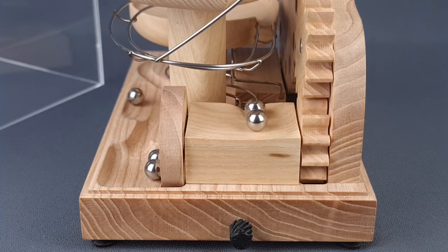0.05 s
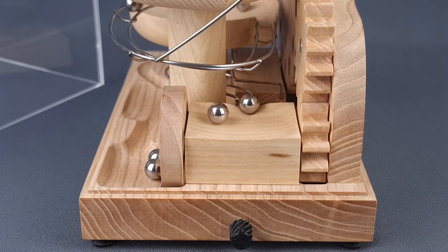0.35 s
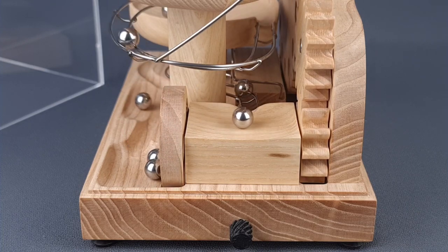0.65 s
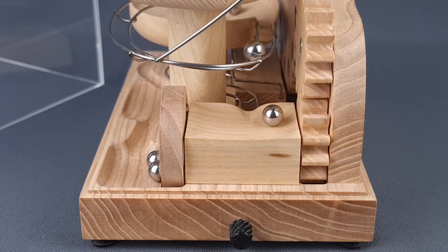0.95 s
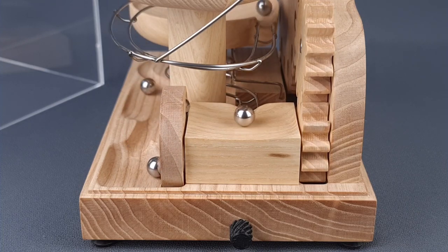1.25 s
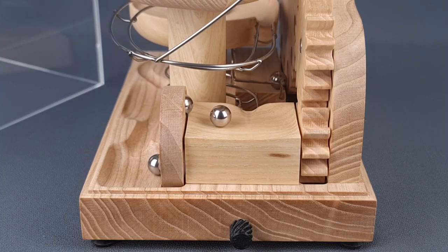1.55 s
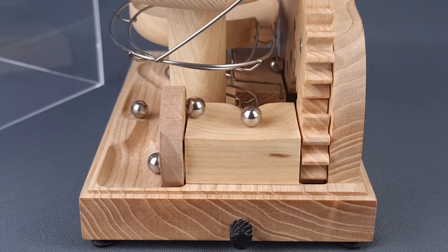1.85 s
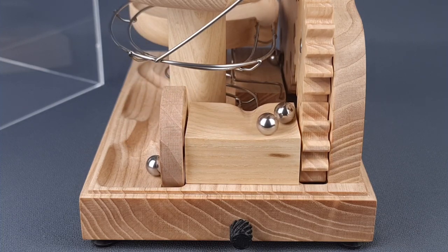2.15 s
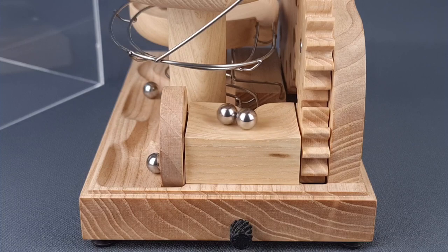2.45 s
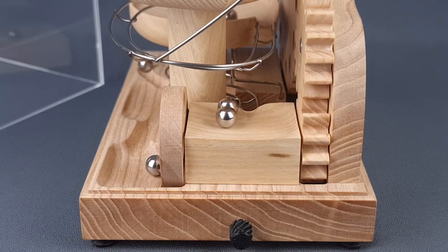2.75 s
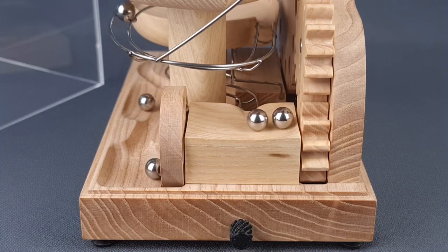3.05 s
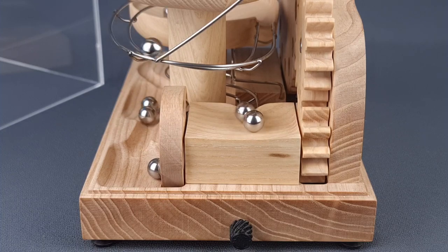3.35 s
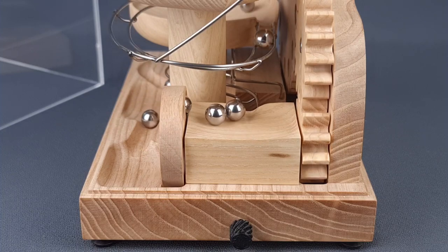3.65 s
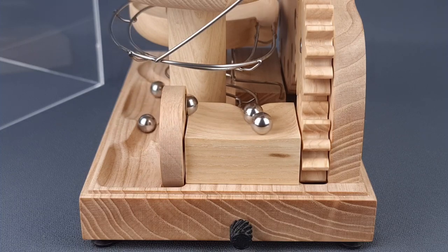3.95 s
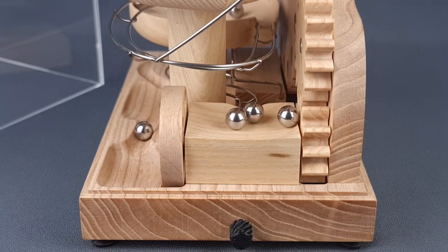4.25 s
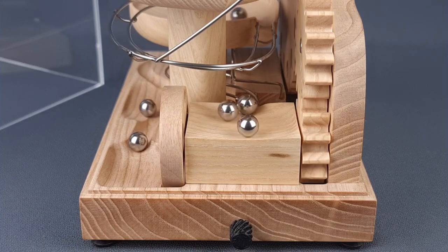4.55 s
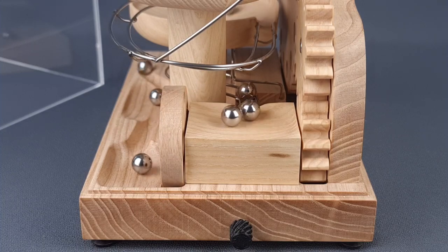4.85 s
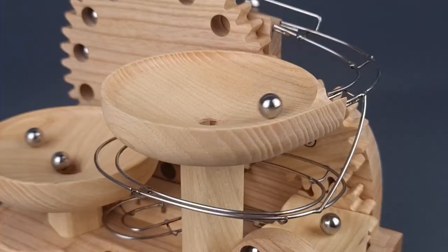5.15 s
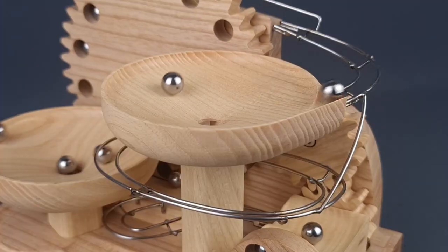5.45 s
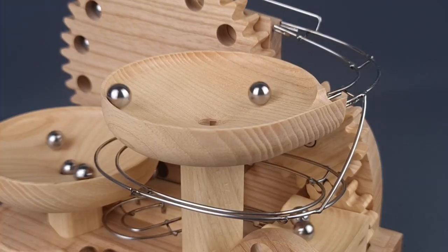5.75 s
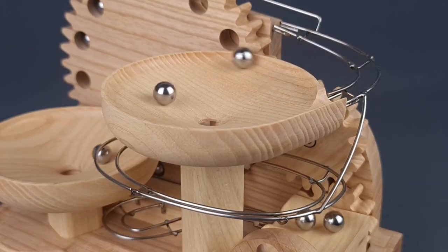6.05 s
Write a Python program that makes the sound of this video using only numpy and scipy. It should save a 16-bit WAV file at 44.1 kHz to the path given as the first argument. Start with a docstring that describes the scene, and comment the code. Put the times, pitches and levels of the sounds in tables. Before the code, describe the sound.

Several small steel balls run continuously through a wooden marble machine. They rumble over carved trays, land on wire rails with ringing pings and rattle along them in short swells. Irregular wooden knocks and bright ball-on-ball clicks come throughout, over a faint hollow hum from the base. Near the end the rolling grows louder as balls circle in a wooden dish. Heard close up in a quiet room.

```python
"""Wooden marble machine

Steel balls run through a small wooden machine on a table in a quiet room. They rumble over trays,
circle in a turned dish and sizzle and rattle along wire rails. They knock on the wood and click
against each other; one mode of the wood sings along, and the hollow base booms underneath."""
import sys
import numpy as np
from scipy import signal
from scipy.fft import rfft, irfft, next_fast_len
from scipy.io import wavfile
from scipy.ndimage import uniform_filter1d, map_coordinates

SR = 44100
rng = np.random.default_rng(int(sys.argv[2]) if len(sys.argv) > 2 else 0)


def master(y):
    """Save y as 16-bit WAV."""
    cut = np.clip(np.atleast_2d(y).T, -1, 1)
    pcm = np.round(cut * 32767)  # scale
    wavfile.write(sys.argv[1], SR, pcm.astype(np.int16))


N = 273420

# Faders for rolling on the trays and in the dish. Each row: time in seconds, relative level in dB.
TRAY_FADER = [(0.0, -52.5), (0.35, -58.5), (1.23, -53.5), (1.39, -47), (2.19, -50.5), (2.43, -55),
              (3.19, -58.5), (3.66, -53.5), (4.02, -44.5), (4.24, -55), (5.08, -48), (5.2, -54)]
DISH_FADER = [(5.18, -48), (5.36, -44.5), (5.51, -43.5), (5.62, -44), (6.04, -45), (6.2, -52)]
# A ball gathers speed on the rails and runs out. Each row: fastest moment in seconds,
# relative level in dB, run-up in seconds, run-out in seconds.
RAIL_RUNS = [(0.09, -47.5, 0.19, 0.11), (0.51, -51, 0.34, 0.1), (0.77, -51.5, 0.31, 0.2),
             (0.989, -42.5, 0.19, 0.11), (1.22, -44.5, 0.27, 0.14), (2.57, -45, 0.025, 0.11),
             (2.698, -47.5, 0.15, 0.095), (3.06, -56, 0.41, 0.93), (3.44, -48.5, 0.15, 0.15),
             (3.61, -41.5, 0.084, 0.12), (3.822, -43, 0.14, 0.082), (4.59, -44, 0.062, 0.057),
             (4.681, -37, 0.075, 0.036), (4.766, -39.5, 0.11, 0.011), (4.95, -46.5, 0.046, 0.031),
             (5.393, -40, 0.33, 0.17), (5.481, -41, 0.11, 0.035)]
# A ball lands on the rails. Each row: start in seconds, hit level in dB, chatter in dB against the hit,
# wire ring level in dB, ring pitch in Hz.
RAIL_LANDINGS = [(0.5224, -35, 2, -36, 5120), (0.827, -32.5, -5.5, -53, 4400),
                 (1.166, -25.5, -17, -35, 4360), (2.4062, -48, -17, -30.5, 3500),
                 (2.5213, -33, 6.5, -35, 4340), (2.5268, -34.5, 8.5, -35.5, 3000),
                 (2.672, -41, 7, -48, 5450), (3.379, -36.5, -1, -47, 3440), (3.7775, -25.5, -20, -36, 4660),
                 (4.189, -21, -14.5, -39, 3500), (4.5343, -24, 0, -21, 3515), (4.7644, -36, 8.5, -33, 5110),
                 (5.0543, -19.5, -20, -41, 5180), (5.258, -18.5, -8.5, -22, 3497)]
# A ball hits wood. Each row: start in seconds, frame level in dB, pitch of the struck spot in Hz,
# its ring level in dB, treble tilt of the frame in dB per octave.
WOOD_KNOCKS = [(0.5225, -31, 3450, -23, 5), (1.3825, -21, 3820, -17.5, -12), (1.393, -24, 1950, -22, -8),
               (1.4108, -19, 3280, -21.5, -2), (1.435, -25, 4300, -21.5, -14),
               (1.488, -13.5, 3780, -12, -1.5), (1.948, -19.5, 4100, -27, -3),
               (2.4061, -19, 3460, -19, -19), (4.0096, -26, 1950, -25.5, -4), (4.0305, -31, 2030, -28, -13),
               (4.0894, -16.5, 1940, -29.5, -19), (4.1562, -20, 3340, -25, -8),
               (4.547, -10, 3450, -22, -17), (5.2285, -15.5, 2400, -33, 0), (5.2706, -9.5, 3640, -16, -9),
               (5.4925, -16, 5100, -22, 1), (5.617, -15.5, 5060, -23, -3), (5.7, -15.5, 6350, -18.5, 3),
               (5.947, -32, 4520, -22.5, -7), (5.9705, -14, 3280, -15.5, -8),
               (6.1825, -22.5, 3180, -27, -16)]
# Light taps on a tray wall. Each row: start in seconds, level in dB.
WALL_TAPS = [(1.6435, -36), (1.694, -35), (1.7161, -39), (2.106, -31), (2.1631, -30), (2.229, -25.5),
             (2.2808, -31), (2.4705, -25), (2.484, -31)]
# Ball against ball. Each row: start in seconds, level in dB, centre in Hz, left minus right in dB.
BALL_CLICKS = [(0.148, -32, 12100, 1), (1.3114, -35, 14000, 0), (1.337, -21, 9700, 0),
               (1.868, -30, 7300, 5), (2.0703, -30.5, 10900, -4), (3.364, -28.5, 8300, 4),
               (4.058, -26, 6000, 4), (4.186, -25.5, 7200, 5), (4.249, -23, 12900, -5),
               (4.463, -33, 9500, 5), (5.09, -23, 13300, 2), (6.052, -27, 13900, 0)]
# A ball crosses the wood's most resonant spot (sings) or the hollow base (booms).
# Each row: start in seconds, level in dB, hold in seconds.
SINGS = [(1.255, -39, 0.015), (1.393, -36, 0.03), (1.484, -33, 0.012), (1.573, -40.5, 0.026),
         (1.94, -48, 0.044), (4.031, -31, 0.021), (4.075, -36, 0.037), (4.326, -41.5, 0.023),
         (4.385, -50, 0.11), (5.36, -38, 0.15)]
BOOMS = [(0.97, -60, 0.23), (1.93, -49.5, 0.028), (2.08, -56, 0.33), (3.4, -60, 0.91), (4.08, -50.5, 0.028),
         (5.02, -53.5, 0.079), (5.945, -45.5, 0.038)]
# The standout resonances of each part. Each row: pitch in Hz, bandwidth in Hz, relative level in dB.
TRAY_MODES = [(423.7, 10.3, -12.5), (1641, 26, -1), (2001.4, 23, 2), (2994, 91, -10.5), (3490, 99, -13.5)]
DISH_MODES = [(1310, 55, 8.4), (1678, 50, 10.7), (2010, 32, 11.8)]
RAIL_MODES = [(3024, 79, -6), (3463, 46, 0), (4483, 81, -0.5), (6170, 170, -0.5), (8850, 320, -6)]
# The bed of dense, weaker modes between them. Each row: frequency in Hz, relative level in dB.
TRAY_BED = [(150, -27), (330, -39.5), (440, -17), (880, -23.5), (1350, -8.5), (1700, -15.5), (2400, -15.5),
            (4600, -30), (8400, -35.5), (10300, -46), (14000, -78)]
DISH_BED = [(300, -31), (450, -14.5), (900, -22), (1250, -3), (2100, -15), (2500, -10), (3000, -12),
            (5500, -27), (8500, -30.5), (16000, -70)]
RAIL_BED = [(300, -29.5), (870, -20), (1100, -2.5), (2400, -4), (6300, -1.5), (7650, -9), (8500, -8),
            (14500, -9.5), (16000, -12)]
# Tone of the hollow base and of the room's air. Each row: frequency in Hz, relative level in dB.
BASE_EQ = [(25, -59), (60, -18), (88, -13.5), (103, 1.5), (121, 8), (145, -13.5), (195, -8.5), (240, -30),
           (900, -43)]
AIR_EQ = [(120, 12), (1000, -31), (8000, 12), (13000, -39)]
# Stereo image. Each row: frequency in Hz, correlation of left and right (1 is mono).
STEREO_CORRELATION = [(200, 0.99), (600, 0.84), (1300, 0.8), (2000, 0.18), (2700, 0.02), (8000, 0.048)]
# Reverb tail. Each row: frequency in Hz, time to fall 60 dB in seconds.
ROOM_DECAY = [(200, 0.2), (2000, 0.2), (6000, 0.11), (15000, 0.0047)]
# Modes of the rail wires. Each entry: pitch in Hz.
WIRE_HZ = [2940, 3170, 3480, 4325, 4465, 5140, 6100, 6350, 8430]

SCUFF_S = .002  # decay of the scuff from one tiny hop
RUN_DEPTH_DB = 20  # swell over a run-up or run-out
WIRE_T60_S, RATTLE_PER_S, RATTLE_DB = 0.12, 70, -1.5
REBOUND_RANGE_S, REBOUND_LOSS_DB = (.006, .022), 5
SING_ATTACK_S, SING_T60_S, SING_FOLLOW_DB = 0.0011, 0.044, -9  # follow: level against the rolling faders
BOOM_ATTACK_S, BOOM_T60_S, BOOM_FOLLOW_DB = 0.0028, 0.78, -13
DROPOUT_S, TOP_HZ = (5.170, 5.180), 16000
LEFT_LEAD_S = (.00022, .00009)  # before and after the dropout

FFT_SIZE = 2 * next_fast_len(N // 2 + SR // 4)
HZ, TIME = np.fft.rfftfreq(FFT_SIZE, 1 / SR), np.arange(N) / SR
HIT_HZ, HIT_TIME = np.fft.rfftfreq(SR // 8, 1 / SR), np.arange(SR // 8) / SR


def trays(wood):
    """Balls rumble over the carved trays, driving the modes of the wood."""
    return filtered(rolling(bumps_per_s=110, bump_db=-5.5), wood) * fader(TRAY_FADER) * amp(4.0)


def dish():
    """Balls circle close by in the turned dish and set its modes ringing."""
    force = rolling(bumps_per_s=170, bump_db=-3.5) * fader(DISH_FADER) * amp(3.0)
    return filtered(force, body(DISH_BED, DISH_MODES, modes_db=-9.5))


def rails(swell):
    """Balls land on the steel wires, chatter to rest and sizzle along them."""
    sizzle = rolling(bumps_per_s=110, bump_db=1) * swell * amp(4.5)
    drops, pings = np.zeros((2, 2, N))
    for start, db, chatter_db, ring_db, hz in RAIL_LANDINGS:
        add(drops, start, amp(db) * impact(t60=.03, chatter_db=chatter_db, chatter_t60=.2))
        add(pings, start, amp(ring_db) * wire_ring(hz))
    # a landing presses longer than a surface bump, so it is duller
    drops = filtered(drops, 1 / (1 + 1j * HZ / 6000))
    return filtered(sizzle + drops, body(RAIL_BED, RAIL_MODES, modes_db=5.5)) + pings


def rattle(swell):
    """A ball skips along the wires; each touch rings a different mix of their modes."""
    touches = hops(RATTLE_PER_S)[0] * swell
    onsets = np.flatnonzero(touches)
    track = np.zeros((2, N))
    rings = np.stack([wire_ring(hz) for hz in WIRE_HZ], axis=-1)
    for onset, mix in zip(onsets, rng.standard_normal((len(onsets), len(WIRE_HZ)))):
        add(track, onset / SR, touches[onset] * (rings @ unit(mix * np.abs(mix))))
    return unit(track) * np.sqrt(np.mean(swell ** 2)) * amp(RATTLE_DB)


def knocks(wood):
    """Each knock sounds the wooden frame and a short ring of the struck spot."""
    frame, spot = np.zeros((2, 2, N))
    # a small ball hardly moves the low modes, and wood is too soft for the top octave
    low_cut = (1j * HIT_HZ / (1100 + 1j * HIT_HZ)) ** 2
    high_cut = 1 / (1 + 1.2j * HIT_HZ / 7500 - (HIT_HZ / 7500) ** 2)
    treble_octaves = np.log2(np.clip(HIT_HZ, 2000, 8000) / 2000)
    for start, frame_db, hz, ring_db, tilt_db in WOOD_KNOCKS:
        force = rfft(impact(t60=.011, chatter_db=-20, chatter_t60=.05)) * high_cut
        hardness = amp(tilt_db * treble_octaves)
        ring = unit(resonance(HIT_HZ, hz, width=1500) * resonance(HIT_HZ, hz, width=4500))
        add(frame, start, amp(frame_db) * irfft(force * low_cut * hardness))
        add(spot, start, amp(ring_db) * irfft(force * ring))
    return filtered(frame, wood) + spot


def taps():
    """Balls tap the tray walls and rebound unevenly; ridges in the wood add faint ticks as they roll."""
    touch = lambda: impact(t60=.007, chatter_db=-22, chatter_t60=.05)
    ridges = unit(signal.fftconvolve(hops(per_s=55), touch(), axes=1)[:, :N])
    track = ridges * fader(TRAY_FADER) * amp(-11.0)
    for start, db in WALL_TAPS:
        for bounce, flight in enumerate(rng.uniform(*REBOUND_RANGE_S, size=3)):
            add(track, start, amp(db - REBOUND_LOSS_DB * bounce) * touch())
            start += flight
    return filtered(track, unit(resonance(HZ, hz=4500, width=3900) ** 4))


def clicks():
    """Steel on steel: very short, very bright ticks, each with its own pan."""
    track = np.zeros((2, N))
    for start, db, hz, pan_db in BALL_CLICKS:
        force = rfft(impact(t60=0.008, chatter_db=-25.0, chatter_t60=0.16))
        brightness = unit(resonance(HIT_HZ, hz, width=14400) ** 2)
        sides = amp(db + np.array([[pan_db], [-pan_db]]) / 2)
        add(track, start, sides * irfft(force * brightness))
    return track


def singing():
    """Rolling keeps one strong mode of the wood ringing, most of all at its resonant spot."""
    mode = resonance(HZ, hz=1985, width=100) * resonance(HZ, hz=1985, width=800)
    ring = filtered(rng.standard_normal((2, N)), mode)
    # the ball feeds the mode without a break, so the ring is compressed and seldom fades out
    ring = unit(ring / np.sqrt(np.abs(signal.hilbert(ring))))
    return ring * np.hypot(amp(SING_FOLLOW_DB) * wood_swell(), held(SINGS, SING_ATTACK_S, SING_T60_S))


def boom():
    """The hollow base hums under the rolling on wood and booms when a ball crosses it."""
    hum = amp(BOOM_FOLLOW_DB) * wood_swell()
    return noise(BASE_EQ) * np.hypot(hum, held(BOOMS, BOOM_ATTACK_S, BOOM_T60_S))


def room(send):
    """A short reverb off the walls that shifts as the balls move about; the treble dies first."""
    wet, step = np.zeros((2, N)), SR // 4
    window = signal.get_window("hann", 2 * step)
    padded = np.pad(send, ((0, 0), (step, 2 * step)))
    for start in range(0, N + step, step):
        hz, age, bands = signal.stft(rng.standard_normal((2, SR // 3)), SR, nperseg=256)
        decay = amp(-60 * age / curve(ROOM_DECAY, hz)[:, None])
        tail = signal.istft(bands * decay, SR, nperseg=256)[1]
        chunk = padded[:, start:start + 2 * step] * window
        reverb = signal.fftconvolve(chunk, tail / np.linalg.norm(tail[0]), axes=1)
        add(wet, (start - step) / SR, reverb[:, max(step - start, 0):])
    return wet


def room_tone():
    """The faint air of the quiet room."""
    return amp(-72) * noise(AIR_EQ)


def rolling(bumps_per_s, bump_db):
    """Contact force of a rolling ball: fine surface grain and tiny hops, each a short scuff."""
    grain = rng.standard_normal((2, N)) * amp(2.2 * wobble(per_s=260))
    scuff_power = signal.lfilter([1], [1, -np.exp(-1 / (SCUFF_S * SR))], hops(bumps_per_s)[0] ** 2)
    bumps = np.sqrt(scuff_power) * rng.standard_normal((2, N))
    sway = amp(.9 * wobble(per_s=20))
    return unit(shifting_modes(unit(grain) + amp(bump_db) * unit(bumps)) * sway)


def hops(per_s):
    """Tiny contacts at random moments, scattered over 14 dB."""
    return (rng.random(N) < per_s / SR) * amp(-14 * rng.random(N)) * rng.choice([-1, 1], (2, N))


def shifting_modes(force):
    """As a ball travels it feeds some modes and misses others: narrow bands swell and fade."""
    bands = signal.stft(force, nperseg=1024)[2]
    drift = rng.standard_normal(bands.shape[1:])
    for _ in range(2):
        drift = uniform_filter1d(uniform_filter1d(drift, size=5, axis=0), size=7, axis=1)
    gain = unit(amp(2.2 * unit(drift)))
    return signal.istft(bands * gain, nperseg=1024)[1][:, :N]


def impact(t60, chatter_db, chatter_t60):
    """A noise burst for the contact, with a longer tail of chatter through the frame."""
    attack = 1 - np.exp(-HIT_TIME / .0004)
    envelope = (amp(-60 * HIT_TIME / t60) + amp(chatter_db - 60 * HIT_TIME / chatter_t60)) * attack
    burst = envelope * rng.standard_normal((2, len(HIT_TIME)))
    return burst * np.sqrt(np.sum(envelope ** 2) / np.sum(burst ** 2))


def wire_ring(hz):
    """One mode of the rail after a touch: its two wires are slightly out of tune and beat."""
    detuned_hz = hz * (1 + .002 * rng.standard_normal((2, 2, 1)))
    tone = np.sin(2 * np.pi * (detuned_hz * HIT_TIME + rng.random((2, 1)))).mean(axis=0)
    attack = 1 - np.exp(-HIT_TIME / 0.00064)
    return tone * attack * amp(-60 * HIT_TIME / WIRE_T60_S)


def body(bed, modes, modes_db):
    """The resonant colour of a part: distinct modes over a bed of dense ones."""
    peaks = sum(np.abs(amp(db + modes_db) * resonance(HZ, hz, width)) ** 2 for hz, width, db in modes)
    power = amp(curve(bed, HZ)) ** 2 + peaks
    # minimum phase, so the ring comes after the hit
    cepstrum = irfft(np.log(power + 1e-12))
    cepstrum[0] /= 2
    return unit(np.exp(rfft(cepstrum[:FFT_SIZE // 2], FFT_SIZE)))


def wood_swell():
    """Envelope of all rolling on wood, trays and dish together."""
    return np.hypot(fader(TRAY_FADER), amp(-2.0) * fader(DISH_FADER))


def rail_swell():
    """Envelope of the rail runs: each swells as the ball speeds up, then fades."""
    power = np.zeros(N)
    for fastest, db, run_up, run_out in RAIL_RUNS:
        from_peak = np.maximum((fastest - TIME) / run_up, (TIME - fastest) / run_out)
        power += amp(db - RUN_DEPTH_DB * from_peak) ** 2
    return np.sqrt(power)


def held(cues, attack_s, t60):
    """Envelope of cues that each build up, hold and ring out."""
    power = np.zeros((1, N))
    for start, db, hold in cues:
        age = TIME[None, :round((hold + t60) * SR)]
        attack = 1 - np.exp(-age / attack_s)
        release_db = 60 * np.maximum(age - hold, 0) / t60
        add(power, start, (attack * amp(db - release_db)) ** 2)
    return np.sqrt(power[0])


def spread(pair):
    """Two unrelated signals become left and right: bass centred, treble wide."""
    angle = np.arccos(np.clip(curve(STEREO_CORRELATION, HZ), -1, 1)) / 2
    mid, side = filtered(pair, np.array([np.cos(angle), np.sin(angle)]))
    return np.array([mid + side, mid - side])


def perspective(pair):
    """The left ear leads; after the dropout the listener is at the dish and it leads less."""
    left, right = pair
    before, after = (filtered(right, np.exp(-2j * np.pi * HZ * lead)) for lead in LEFT_LEAD_S)
    return np.array([left, np.where(TIME < DROPOUT_S[0], before, after)])


def noise(eq):
    """Two unrelated noises shaped by an EQ curve, at rms 1."""
    return unit(filtered(rng.standard_normal((2, N)), amp(curve(eq, HZ))))


def wobble(per_s):
    """A smooth random modulator with per_s points a second."""
    return map_coordinates(rng.standard_normal(int(N * per_s / SR) + 4), [TIME * per_s])


def fader(points):
    """Gain per sample from (seconds, dB) points; silent outside them."""
    return amp(np.interp(TIME, *np.transpose(points), left=-np.inf, right=-np.inf))


def curve(points, hz):
    """Read (Hz, value) points along a log frequency axis."""
    point_hz, values = np.transpose(points)
    return np.interp(np.log(hz + 1), np.log(point_hz + 1), values)


def resonance(f, hz, width):
    """Response of one damped mode at frequencies f; centre and width in Hz."""
    return 1j * f * width / (hz * hz - f * f + 1j * f * width)


def filtered(x, response):
    """Run x through a frequency response on the HZ grid."""
    return irfft(rfft(x, FFT_SIZE) * response, FFT_SIZE)[..., :N]


def add(track, start_s, sound):
    """Mix a sound into a track at its cue."""
    part = track[:, max(round(start_s * SR), 0):][:, :sound.shape[1]]
    part += sound[:, :part.shape[1]]


def amp(db):
    """Decibels to gain."""
    return np.exp(np.asarray(db) * (np.log(10) / 20))


def unit(x):
    """Scale to rms 1."""
    return x / np.sqrt(np.mean(np.abs(x) ** 2) + 1e-20)


def scene():
    """The mix: rolls and hits up front, the booming base and the room behind."""
    wood = body(TRAY_BED, TRAY_MODES, modes_db=-1)
    swell = rail_swell()
    rolls = trays(wood) + dish() + rails(swell) + rattle(swell) + singing()
    hits, ticks = knocks(wood) + taps(), clicks()
    reverb = room(amp(-6.5) * rolls + amp(-5) * (hits + ticks))
    return perspective(spread(rolls + hits + reverb + boom() + room_tone()) + ticks)


def record(dry):
    """The sound drops out for an instant, and everything above TOP_HZ is cut."""
    live = (TIME < DROPOUT_S[0]) | (TIME > DROPOUT_S[1])
    return filtered(dry * live, HZ < TOP_HZ)


dry = scene()
out = record(dry)
master(out)
```